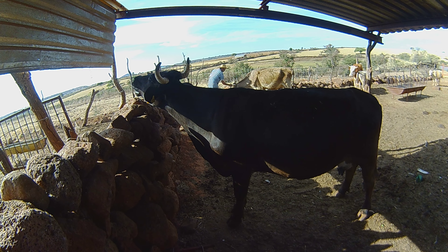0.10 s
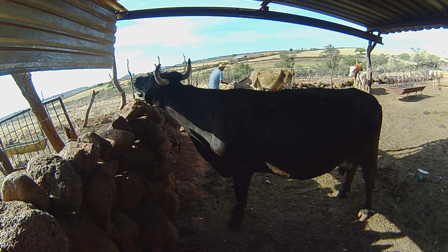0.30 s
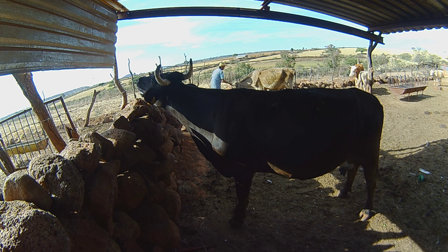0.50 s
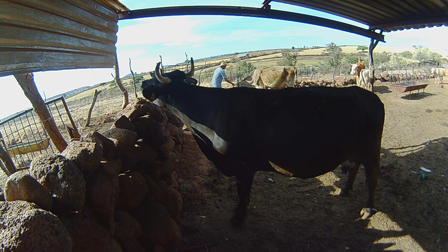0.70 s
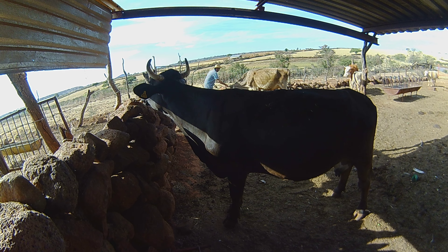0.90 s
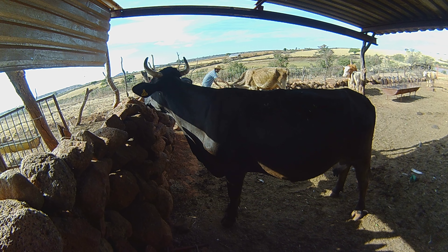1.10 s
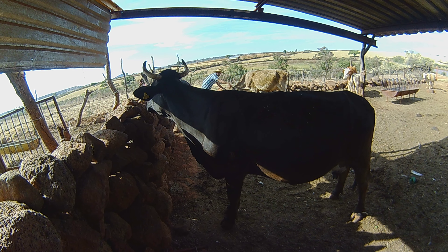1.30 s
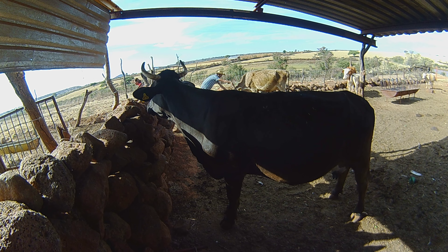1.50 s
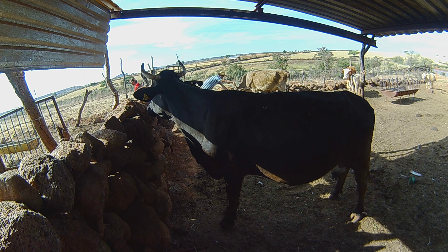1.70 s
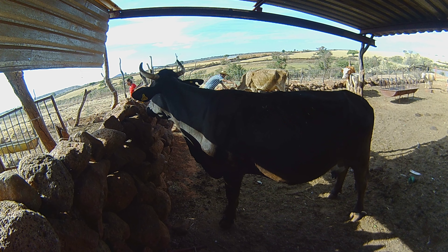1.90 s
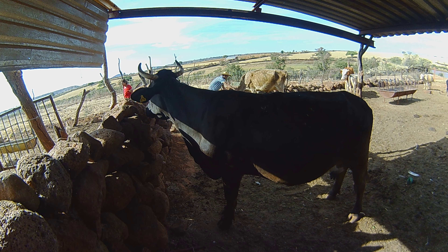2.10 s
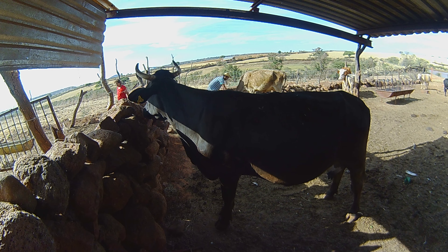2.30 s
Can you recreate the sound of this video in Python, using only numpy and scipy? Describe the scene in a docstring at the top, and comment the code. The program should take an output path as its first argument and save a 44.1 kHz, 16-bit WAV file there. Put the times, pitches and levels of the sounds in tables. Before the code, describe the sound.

A cow's high strained moo, already sounding, breaks into a short growl and stops; breaths follow.

```python
"""Under the tin roof of a stone corral, light wind rumbles on the microphone as a cow bellows at once. Partials
make the high, strained note; a second vibration beats against it and chopped noise roughens it. One tiny tick
falls within the call; the voice then breaks into a short growl of slow pulses and stops. The cow draws air and
snorts, as shaped noise; faint swells of noise rise around 1.4 kHz. Late on, something knocks once close to the
microphone: quick contacts ring short, damped modes."""
import sys
import numpy as np
from scipy import signal
from scipy.fft import rfft, irfft
from scipy.io import wavfile

SR = 44100
rng = np.random.default_rng(int(sys.argv[2]) if len(sys.argv) > 2 else 0)


def materialize(psi):
    """Save the field psi as 16-bit PCM at rate SR to the path in sys.argv[1].

    A 1-D psi becomes a single channel; in a 2-D psi each row is a channel.
    """
    bounded = np.clip(np.atleast_2d(psi).T, -1, 1)
    quanta = np.round(bounded * 32767).astype(np.int16)
    wavfile.write(sys.argv[1], SR, quanta)


N = 109368
T = np.arange(N) / SR

# wind on the microphone, mean level: (time [s], level [dB])
WIND = [(0, -42.5), (.6, -42), (.8, -37), (1.1, -36.5), (1.35, -39.5), (1.5, -41.5), (1.7, -46),
        (1.88, -52.5), (2.1, -44), (2.3, -43.5), (2.48, -44.5)]
# spectrum of the wind: (frequency [Hz], relative level [dB])
WIND_COLOUR = [(10, -3.5), (28, -3), (55, 0.5), (100, -6), (150, -9.5), (220, -17), (350, -26),
               (700, -33.5), (2000, -63.5)]
GUST_DB, GUST_HZ = 2, 22  # rms depth and rate of the lumps in the wind
# spectrum of the open yard: (frequency [Hz], relative level [dB])
YARD_COLOUR = [(40, -4), (200, -5.5), (400, -5.5), (800, -8), (1400, -10.5), (2200, -16), (4000, -19),
               (8000, -23), (13000, -24.5), (17000, -23.5)]
YARD_DB = -57.5

# mean pitch of the held note: (time [s], pitch [Hz])
PITCH = [(0, 522.4), (.04, 515.8), (.09, 512.6), (.135, 511.4), (.17, 513.6), (.24, 513.5), (.3, 507.9),
         (.38, 506.7), (.455, 502.4), (.48, 506.3), (.535, 503.5), (.56, 460.8), (.6, 420.7)]
# strength of the held note: (time [s], fundamental level [dB], octave level [dB])
NOTE = [(0, -18.5, -22.5), (.045, -17, -24), (.13, -17.5, -20), (.24, -19, -20.5), (.38, -17.5, -24.5),
        (.455, -18.5, -34), (.49, -18.5, -26), (.535, -19.5, -34.5), (.563, -22.5, -31), (.578, -45, -36),
        (.62, -62, -56)]
# weak partials: (multiple of the pitch [1], level against the fundamental [dB])
OVERTONES = [(3, -28), (4, -35), (5, -43.5)]
JITTER, SHIMMER = .003, 0.034  # rms share of pitch and of strength

# second vibration in the larynx: (time [s], mean frequency [Hz], level [dB])
SECOND = [(0, 281, -28.5), (.06, 280, -26.5), (.24, 280, -29), (.34, 282, -35), (.42, 280, -35),
          (.5, 274, -32), (.535, 272, -32), (.57, 262, -35), (.61, 215, -44)]
FLUTTER_HZ = 59.15
# sum and difference tones: (multiple of pitch [1], of second vibration [1], of flutter [1])
MIXES = [(1, -1, 0), (0, 1, 0), (0, 1, 1), (2, -1, 0), (1, 1, 0), (1, 1, 1), (2, 0, -2), (2, 1, 0),
         (3, 0, -2)]
# one entry for each of those tones: level against the second vibration's level [dB]
MIXES_DB = [0, -10, -13.5, -4, -11, -4, -5.5, -8.5, -16]
SECOND_JITTER, FLUTTER_JITTER, MIX_SHIMMER = .007, .04, .25  # rms shares

# hoarse air through the throat: (time [s], relative level [dB])
RASP = [(0, -28), (.1, -30.5), (.27, -30.5), (.33, -31.5), (.41, -31.5), (.5, -33), (.56, -24.5),
        (.605, -22), (.635, -43), (.665, -62)]
# spectrum of the throat: (frequency [Hz], relative level [dB])
THROAT = [(100, -18), (190, -12.5), (250, -5), (340, -2.5), (410, -13.5), (560, -7), (680, -1.5),
          (900, -3.5), (1150, -8), (1420, -7.5), (1700, -12), (2100, -23.5), (2600, -29.5), (3050, -37.5),
          (4000, -31.5), (6400, -39.5), (7100, -35.5), (8000, -50), (15000, -51)]
# narrow upper resonances: (frequency [Hz], width of each of two passes [Hz], level against the rasp [dB])
UPPER = [(3520, 240, -35), (4340, 60, -37.5), (5010, 400, -33.5)]
SHUT_S, SHUT_DB_PER_S, SHUT_HZ = 0.48, 142, 1400  # the closing mouth takes the treble away

# a rough partial that sinks as the mouth closes: (time [s], mean frequency [Hz], relative level [dB])
GLIDE = [(.22, 912, -42.5), (.28, 905, -37), (.33, 895, -24), (.41, 870, -29.5), (.46, 841.4, -29.5),
         (.5, 837, -24), (.525, 778.6, -29.5), (.56, 769.7, -24), (.585, 682, -25), (.615, 617, -37)]
GLIDE_JITTER, GLIDE_SHIMMER = .022, .5  # rms shares

# spectrum of the tick: (frequency [Hz], relative level [dB])
TICK_COLOUR = [(1000, -10), (3500, 0), (6000, 3.5), (8000, -9.5), (10500, -4.5), (16000, -16.5)]
TICK_S, TICK_DECAY_S, TICK_DB = .2930, 0.00031, -70  # level is the rms over the whole scene

# the voice breaks into its low register: (time [s], mean frequency [Hz], relative level [dB])
BREAK = [(.46, 249, -44), (.5, 254.3, -24.5), (.535, 283.2, -33), (.551, 290.3, -20), (.571, 280, -15.5),
         (.583, 267.7, -39), (.605, 253.4, -22), (.63, 214.4, -20.5), (.65, 205, -43), (.68, 213, -55)]
# partials of the low register: (multiple of its frequency [1], level against its fundamental [dB])
BREAK_OVERTONES = [(2, -20.5), (3, -22), (4, -17.5), (5, -15.5)]
# closing growl: (time [s], mean pulse rate [pulses/s], relative level [dB])
GROWL = [(.54, 110, -45), (.57, 92, -28), (.585, 88, -27), (.605, 82, -22), (.63, 74, -26), (.65, 72, -38),
         (.675, 70, -60)]
# resonances of the growl: (frequency [Hz], half the width of each of two passes [Hz], relative level [dB])
GROWL_THROAT = [(150, 24, 2), (280, 80, -4.5), (421, 40, -5), (670, 130, -13.5), (1080, 72, -18.5),
                (1420, 150, -34)]

# air through the muzzle:
# (start [s], rise [s], hold [s], fade [dB/s], relative level [dB], relative hiss level [dB])
PUFFS = [(0.677, 0.063, .1, 75, -43.5, -60), (1.476, 0.012, 0.021, 132, -42, -50.5),
         (1.55, 0.019, .015, 52, -54, -62.5), (1.65, 0.025, 0.021, 64, -49.5, -60),
         (1.77, 0.042, 0.093, 60, -57, -74)]
# spectrum of the breath in the muzzle: (frequency [Hz], relative level [dB])
MUZZLE = [(200, -3.5), (450, -3.5), (650, 2.5), (950, 1), (1250, -6), (1520, -7), (1900, -20.5),
          (3000, -32), (6000, -57)]
# spectrum of the hiss: (frequency [Hz], relative level [dB])
HISS = [(1500, -9), (3000, -13), (3700, -5), (4400, -16), (5200, -10.5), (6800, -16), (8500, -30),
        (15000, -21)]

# faint swells of noise: (middle [s], length [s], level [dB])
FAINT_SWELLS = [(1.363, .025, -58), (2.26, 0.082, -59), (2.447, .08, -58)]
# spectrum of the faint swells: (frequency [Hz], relative level [dB])
FAINT_SWELL_COLOUR = [(300, -11), (800, -3), (1450, 2), (2000, -11), (3700, -13), (8000, -28)]

# contacts of one knock with its rattle: (time [s], relative level [dB])
KNOCKS = [(2.3040, -24.5), (2.3056, -16.5), (2.3070, -25), (2.3082, -14), (2.3108, -39), (2.3130, -25.5)]
# modes of the knocked object: (frequency [Hz], relative level [dB], time to fall 60 dB [s])
KNOCK_MODES = [(76.6, -24, .04), (345, -3, 0.023), (563, -2.5, 0.018), (780, -1, 0.017), (940, -4, 0.011),
               (1460, -1.5, 0.01), (2090, -2, 0.0039), (2610, -14, 0.022), (3930, -11, 0.0062),
               (5820, -8.5, 0.0058), (7040, -8.5, 0.0034), (10500, -14, 0.0022)]
GRIT_DB, GRIT_DECAY_S, CONTACT_HZ = -25, .002, 7500  # the contact is softened above CONTACT_HZ

# reverberation under the roof: (frequency [Hz], time to fall 60 dB [s])
SHED = [(150, 0.16), (500, .55), (1000, 0.19), (3000, 0.36), (9000, 0.12)]
NOTE_WET_DB, ROUGH_WET_DB, KNOCK_WET_DB = -22, -12.5, -26

WHINE_HZ, WHINE_DB, EDGE_HZ = 16904, -71, 17200  # the recorder's whine and upper band limit


def amp(db):
    """Decibels to gain."""
    return 10 ** (np.asarray(db) / 20)


def unit(x):
    """Scales to rms 1."""
    return x / np.sqrt(np.mean(x ** 2) + 1e-20)


def curve(table, column):
    """One column of a table, joined by straight lines in time."""
    rows = np.array(table, float)
    return np.interp(T, rows[:, 0], rows[:, column])


def level(table, column):
    """Gain from a dB column, fading fast outside the table's span."""
    outside = np.maximum(table[0][0] - T, 0) + np.maximum(T - table[-1][0], 0)
    return amp(curve(table, column)) * np.exp(-outside * 100)


def read(points, hz):
    """Reads a table on a log-frequency axis."""
    f, value = np.transpose(points)
    return np.interp(np.log(hz + 1), np.log(f + 1), value)


def colour(x, points):
    """Filters by a spectrum; rms 1."""
    gain = amp(read(points, np.fft.rfftfreq(N, 1 / SR)))
    return unit(irfft(rfft(x) * gain, N))


def noise(points):
    """Coloured noise of rms 1."""
    return colour(rng.standard_normal(N), points)


def wander(rate_hz):
    """Slow chance of rms 1, up to about the given rate."""
    hz = np.fft.rfftfreq(N, 1 / SR)
    return unit(irfft(rfft(rng.standard_normal(N)) * np.exp(-(hz / rate_hz) ** 2), N))


def phase(hz):
    """Running angle of a frequency curve."""
    return 2 * np.pi * np.cumsum(hz * np.ones(N)) / SR


def resonate(x, hz, width_hz):
    """A resonance: shifts its frequency to zero, smooths, and shifts back."""
    turn = np.exp(1j * phase(hz))
    r = np.exp(-np.pi * width_hz / SR)
    smooth = signal.lfilter([1 - r], [1, -r], x / turn + 1e-18)
    return 2 * (turn * smooth).real


def resonate_twice(x, hz, width_hz):
    """Two equal resonances in a row, for steeper skirts; rms 1."""
    return unit(resonate(resonate(x, hz, width_hz), hz, width_hz))


def tone(angle, shimmer, rate_hz=45):
    """A partial of about rms 1 whose strength trembles."""
    start = 2 * np.pi * rng.random()
    return np.sqrt(2) * np.sin(angle + start) * (1 + shimmer * wander(rate_hz))


def air():
    """Lumpy wind on the microphone over the quiet yard, both coloured noise of wandering level."""
    wind = amp(curve(WIND, 1) + GUST_DB * wander(GUST_HZ)) * noise(WIND_COLOUR)
    yard = amp(YARD_DB + .5 * wander(rate_hz=8)) * noise(YARD_COLOUR)
    return wind + yard


def note(folds):
    """The clean high note of the vocal folds: fundamental, strong octave, weak overtones."""
    upper = sum(amp(db) * tone(round(k) * folds, MIX_SHIMMER) for k, db in OVERTONES)
    fundamental = tone(folds, SHIMMER)
    octave = tone(2 * folds, SHIMMER)
    return level(NOTE, 1) * (fundamental + upper) + level(NOTE, 2) * octave


def beating(folds):
    """A second vibration and a flutter mix with the note into sum and difference tones."""
    second = phase(curve(SECOND, 1) * (1 + SECOND_JITTER * wander(rate_hz=47)))
    flutter = phase(FLUTTER_HZ * (1 + FLUTTER_JITTER * wander(rate_hz=27)))
    tones = np.zeros(N)
    for (a, b, c), db in zip(MIXES, MIXES_DB):
        tones += amp(db) * tone(a * folds + b * second + c * flutter, MIX_SHIMMER, rate_hz=25)
    return level(SECOND, 2) * tones


def rasp(folds):
    """Air chopped by the folds fills the throat and rings its upper resonances; it dulls as the mouth shuts."""
    chopped = rng.standard_normal(N) * (1 + np.cos(folds))
    upper = sum(amp(db) * resonate_twice(chopped, hz, width) for hz, width, db in UPPER)
    full = colour(chopped, THROAT) + upper
    dull = signal.sosfiltfilt(signal.butter(2, SHUT_HZ, fs=SR, output="sos"), full)
    treble = full - dull
    opening = amp(-SHUT_DB_PER_S * np.maximum(T - SHUT_S, 0))
    return level(RASP, 1) * (dull + treble * opening)


def glide():
    """An unsteady partial slides down below the octave in the second half of the call."""
    angle = phase(curve(GLIDE, 1) * (1 + GLIDE_JITTER * wander(rate_hz=190)))
    return level(GLIDE, 2) * tone(angle, GLIDE_SHIMMER, rate_hz=80)


def tick():
    """One tiny bright tick during the call: a burst of noise that dies at once."""
    burst = (T >= TICK_S) * np.exp(-abs(T - TICK_S) / TICK_DECAY_S) * rng.standard_normal(N)
    return amp(TICK_DB) * colour(burst, TICK_COLOUR)


def growl():
    """The voice drops to its low register and falls apart into slow, uneven pulses that ring the throat."""
    low = phase(curve(BREAK, 1) * (1 + 0.022 * wander(rate_hz=79)))
    voice = tone(low, shimmer=0.41)
    voice += sum(amp(db) * tone(round(k) * low, shimmer=1.0) for k, db in BREAK_OVERTONES)
    started = T > GROWL[0][0]
    turns = phase(started * curve(GROWL, 1) * (1 + .07 * wander(rate_hz=65))) / (2 * np.pi)
    pulses = np.diff(np.floor(turns), prepend=0)  # one click per whole turn
    body = sum(amp(db) * resonate_twice(pulses, hz, 2 * width) for hz, width, db in GROWL_THROAT)
    return level(BREAK, 2) * voice + amp(-2) * level(GROWL, 2) * unit(body)


def snorts():
    """The cow draws air after the call, then blows through its nose: noise that swells and fades."""
    out = np.zeros(N)
    for start, rise, hold, fade, db, hiss_db in PUFFS:
        swell = np.clip((T - start) / rise, 0, 1)
        fall = amp(-fade * np.maximum(T - start - rise - hold, 0))
        out += swell * fall * (amp(db) * noise(MUZZLE) + amp(hiss_db) * noise(HISS))
    return out * amp(0.93 * wander(rate_hz=210))


def faint_swells():
    """Soft swells of noise around 1.4 kHz, barely above the quiet of the yard."""
    swell = sum(amp(db) * np.exp(-(2 * (T - middle) / length) ** 2) for middle, length, db in FAINT_SWELLS)
    return swell * noise(FAINT_SWELL_COLOUR)


def knock():
    """A few quick, gritty contacts ring a small, dead object near the microphone."""
    force = np.zeros(N)
    for start, db in KNOCKS:
        click = np.arange(N) == round(start * SR)
        grit = (T >= start) * np.exp(-abs(T - start) / GRIT_DECAY_S) * rng.standard_normal(N)
        force += amp(db) * (click + amp(GRIT_DB) * grit)
    body = np.zeros(N)
    for k, (hz, db, t60) in enumerate(KNOCK_MODES):
        body += (-1) ** k * amp(db - 60 * T / t60) * np.sin(2 * np.pi * hz * T)
    soft = signal.lfilter(*signal.butter(1, CONTACT_HZ, fs=SR), force)
    return amp(-6.5) * signal.fftconvolve(soft, body)[:N]


def shed(x):
    """Sparse reflections from roof and walls, each band dying at its own speed."""
    late = np.arange(SR) > .004 * SR  # none in the first 4 ms
    taps = rng.choice([-1., 1.], SR) * (rng.random(SR) < 2000 / SR) * late  # about 2000 per second
    hz, t, bands = signal.stft(taps, SR, nperseg=256)
    decay = amp(-60 * t / read(SHED, hz)[:, None])
    tail = signal.istft(bands * decay, SR, nperseg=256)[1]
    return signal.fftconvolve(x, tail / np.linalg.norm(tail))[:N]


def scene():
    """The wind, the cow under the roof, the faint swells and the close knock."""
    wind_and_yard = air()
    folds = phase(curve(PITCH, 1) * (1 + JITTER * wander(rate_hz=49)))
    clean = note(folds) + beating(folds)
    rough = rasp(folds) + glide() + growl() + snorts()
    hit = knock()
    echo = shed(amp(NOTE_WET_DB) * clean + amp(ROUGH_WET_DB) * rough + amp(KNOCK_WET_DB) * hit)
    mix = wind_and_yard + clean + amp(-1.0) * rough + tick() + faint_swells() + hit + echo
    return mix[None]


def record(dry):
    """The recorder adds a faint high whine and limits the band."""
    whine = amp(WHINE_DB) * np.sqrt(2) * np.sin(phase(WHINE_HZ))
    band = signal.firwin(1023, EDGE_HZ, window=("kaiser", 9), fs=SR)
    return signal.oaconvolve(dry + whine, band[None], "same")


dry = scene()
out = record(dry)
materialize(out)
```